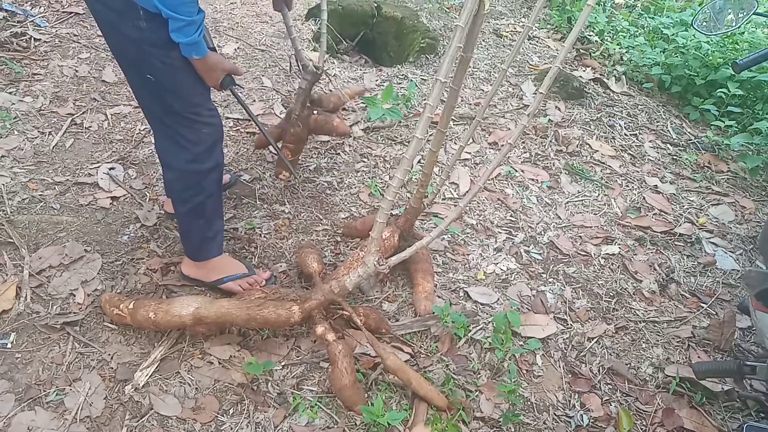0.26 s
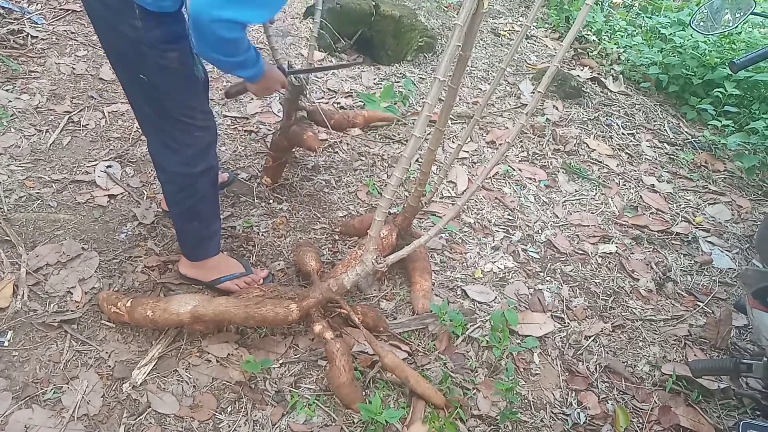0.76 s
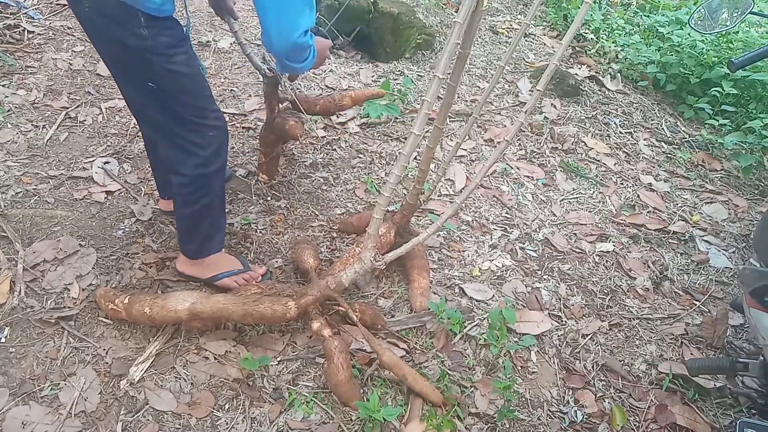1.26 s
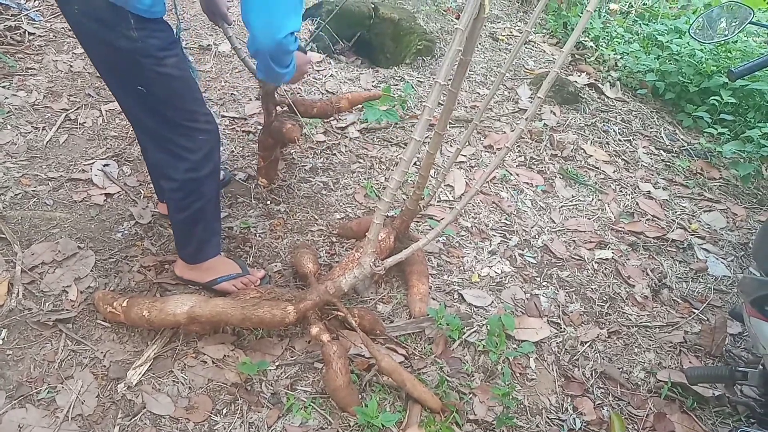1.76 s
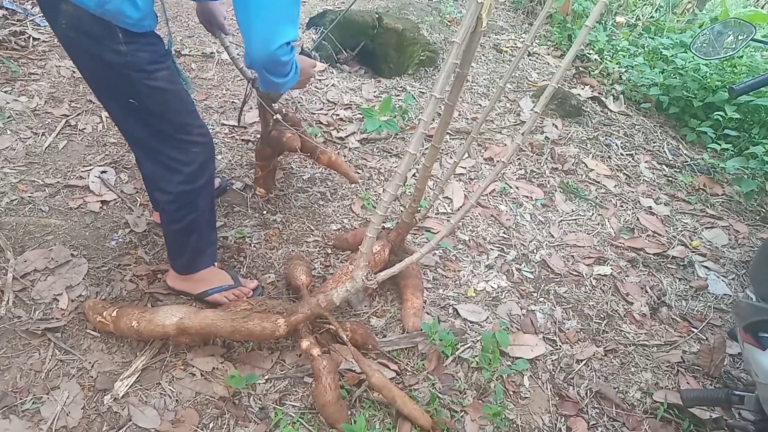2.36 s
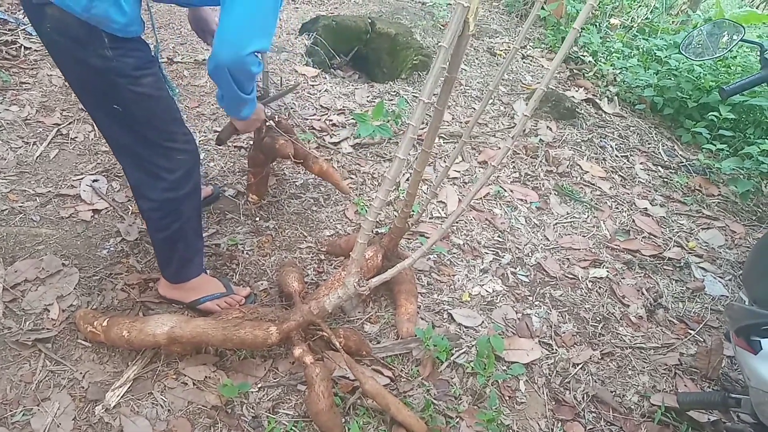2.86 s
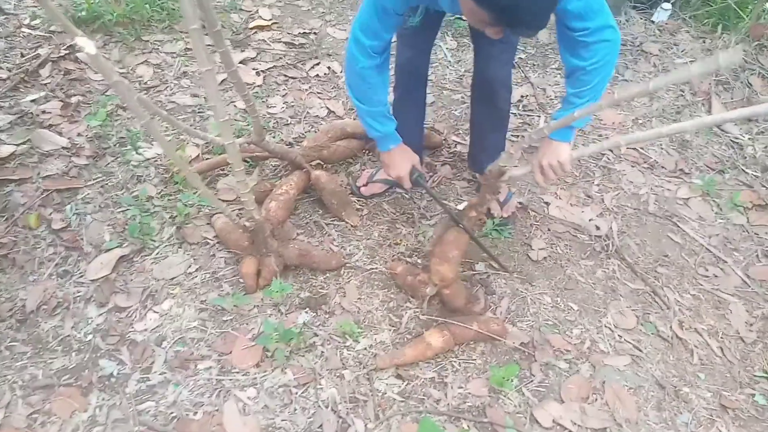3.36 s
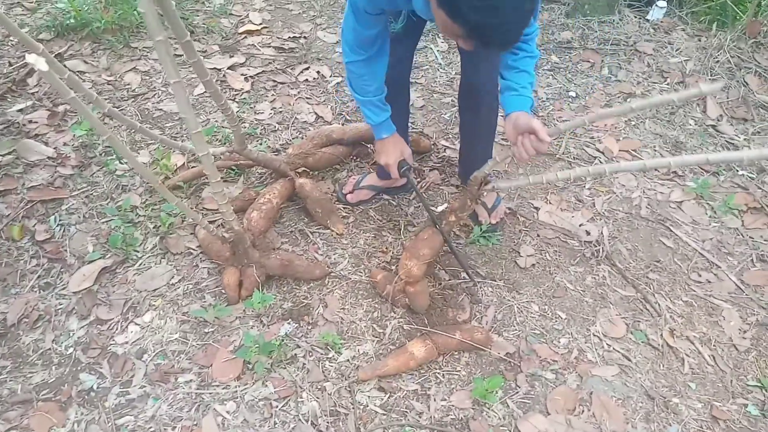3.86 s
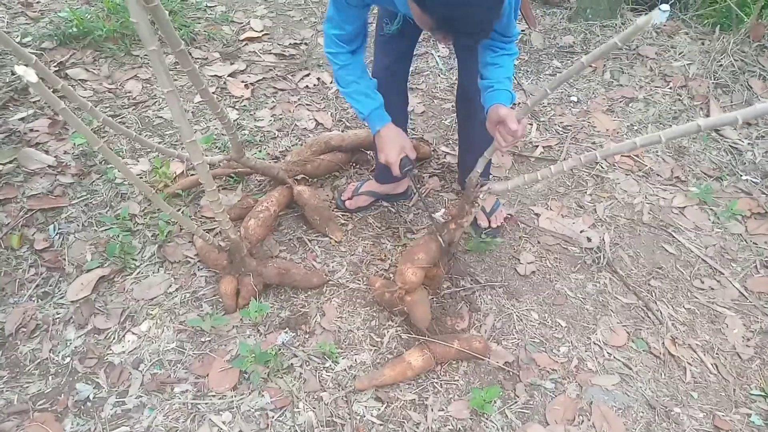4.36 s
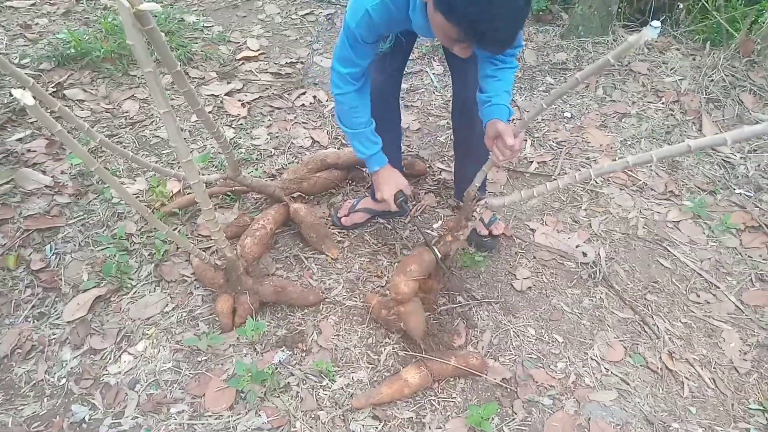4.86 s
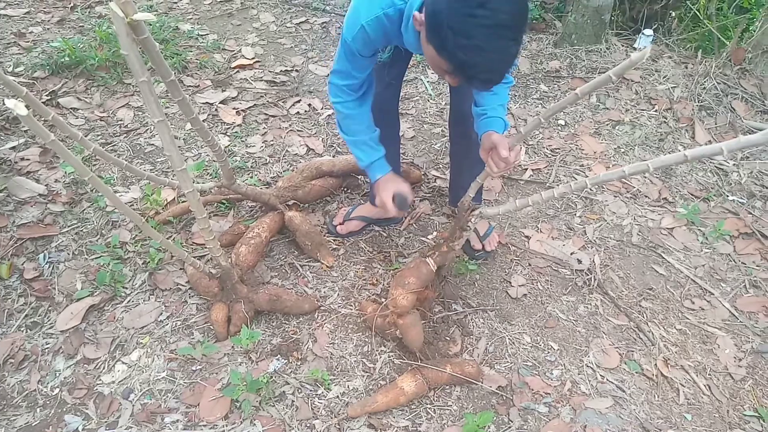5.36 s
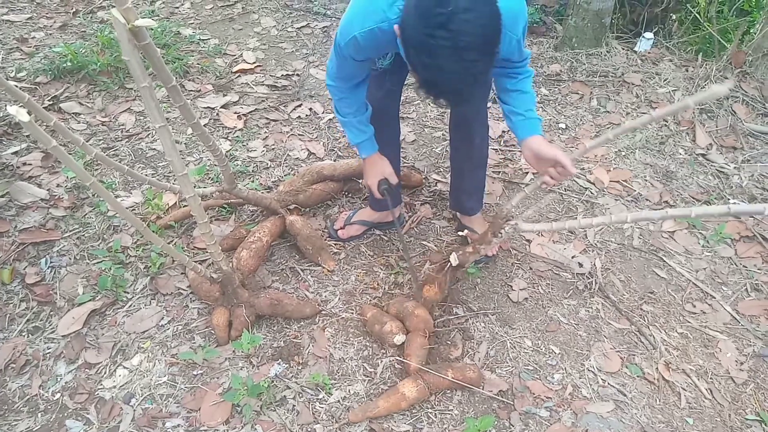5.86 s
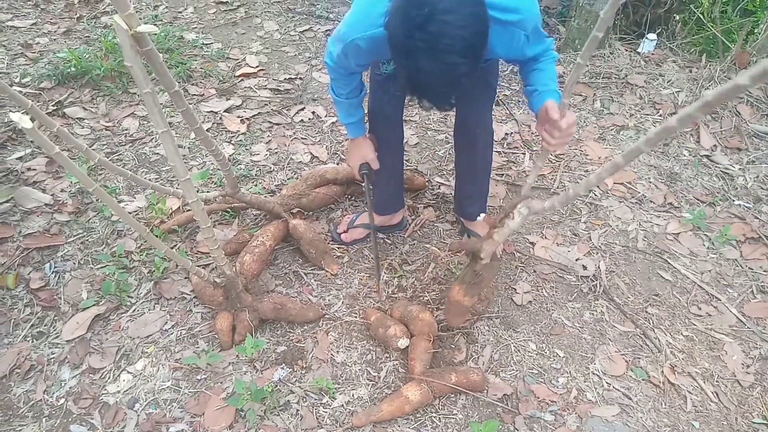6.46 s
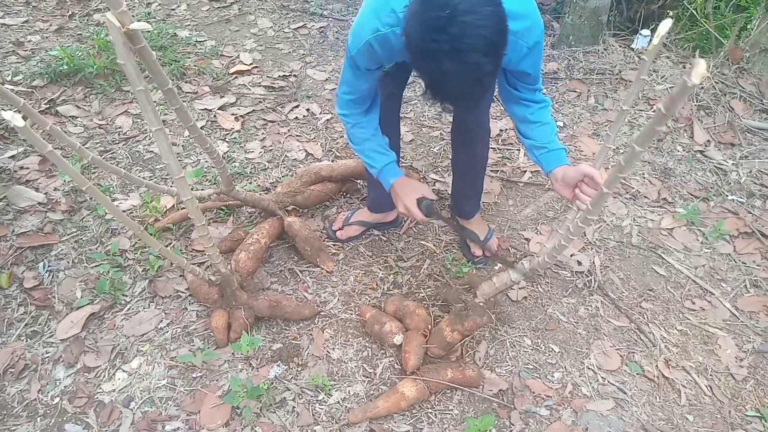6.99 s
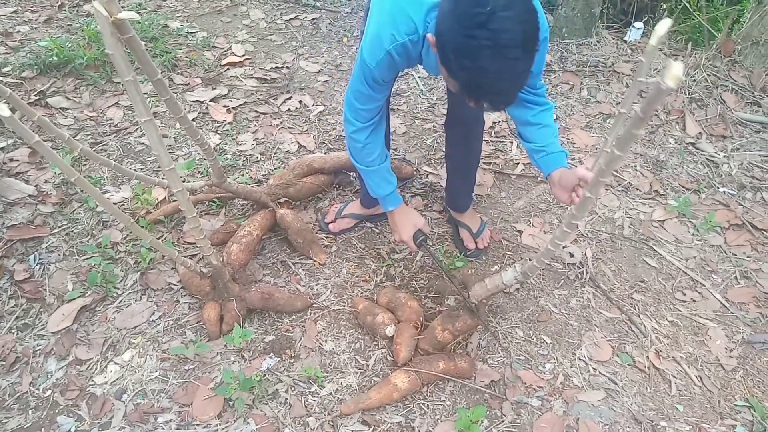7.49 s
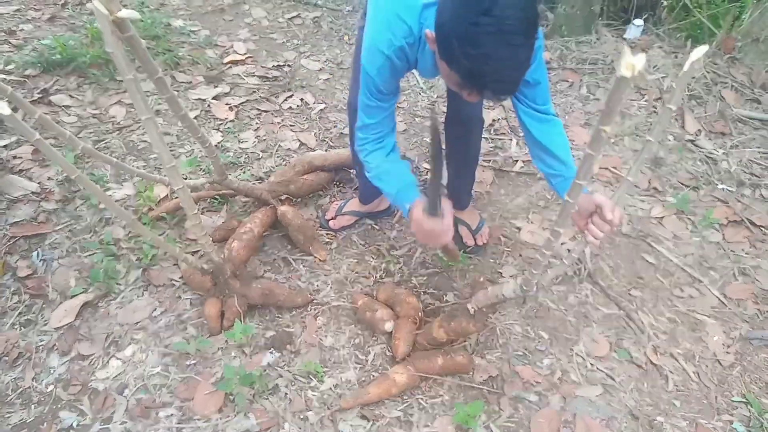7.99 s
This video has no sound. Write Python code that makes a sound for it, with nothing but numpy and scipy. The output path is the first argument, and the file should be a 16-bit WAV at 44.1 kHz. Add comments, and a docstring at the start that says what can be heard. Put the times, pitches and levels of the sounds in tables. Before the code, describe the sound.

A low, drifting far rumble and soft hiss lie under a dry garden scene, heard from close by. At first only soil grains rustle and a twig snaps faintly. From about 1.6 to 3 s small birds give faint, fuzzy rising whistles and a far fowl clucks. A blade chops a tuber at 1.9 s and more lightly at 2.75 s, leaves crunching between. At 3.07 s everything drops to silence for a tenth of a second, then fades back as a brighter chop lands at 3.3 s. Crumbs and twigs tick until a hard, close-set double strike at 4.8 s and the loudest crack at 5.45 s, followed by bumping tubers and brittle snaps. Leaves crunch around 6.2 and 6.6 s. Further woody blows fall at 7.35 and 8.15 s with snaps, trickling soil and short scattered echoes.

```python
"""A low far rumble (drifting noise), a soft hiss and a rustle of grains and snapping twigs open the scene.
Small birds whistle faintly (noise in gliding resonances) and a far fowl clucks (two partials).
Then a long blade chops root tubers on dry ground in a garden: runs of cracks ring wood and blade.
Soil and dead leaves crunch and trickle around the blows, tubers bump the ground, and echoes scatter.
Soon after 3 s the sound drops out once for a moment and fades back in; the chopping goes on."""
import sys
import numpy as np
from scipy import signal
from scipy.fft import rfft, irfft
from scipy.io import wavfile
from scipy.ndimage import uniform_filter1d

SR = 44100
rng = np.random.default_rng(int(sys.argv[2]) if len(sys.argv) > 2 else 0)


def store_wav(level_fs):
    """Save 16-bit WAV to argv[1]."""
    pcm = np.round(np.clip(np.atleast_2d(level_fs), -1, 1) * 32767)
    wavfile.write(sys.argv[1], SR, pcm.T.astype(np.int16))


N = 362943


def amp(db):
    """Level to amplitude: 20 dB is a factor of ten."""
    return 10 ** (np.asarray(db) / 20)


def evened(x):
    """Power normalisation: scales to rms 1."""
    return x / np.sqrt(np.mean(x ** 2) + 1e-20)


def topped(x):
    """Peak normalisation: scales to peak 1."""
    return x / (abs(x).max() + 1e-20)


def smoothed_twice(x, size, axis=-1):
    """Moving average: two passes leave only slow change."""
    return uniform_filter1d(uniform_filter1d(x, size, axis=axis), size, axis=axis)


def bandpass(x, order, lo_hz, hi_hz):
    """Band filtering: a Butterworth passband between two corners."""
    return signal.sosfilt(signal.butter(order, (lo_hz, hi_hz), "band", fs=SR, output="sos"), x)


def read(points, hz):
    """Spectral envelope: interpolates levels on a log frequency axis."""
    f, value = np.transpose(points)
    return np.interp(np.log(hz + 1), np.log(f + 1), value)


def add(mix, s, sound):
    """Superposition: adds a sound in at time s."""
    part = mix[max(round(s * SR), 0):][:len(sound)]
    part += sound[:len(part)]


def coloured(x, points, tilt_db=0):
    """Linear filtering: weights by a spectrum, tilted about 3 kHz in dB per octave."""
    hz = np.fft.rfftfreq(len(x), 1 / SR)
    tilt = tilt_db * np.log2(hz / 3000 + 0.057)  # the offset keeps the bass finite
    return irfft(rfft(x) * amp(read(points, hz) + tilt), len(x))


def ring(modes, focus_hz=0, narrow_db=0):
    """Modal response: sines die away; modes near the focus and its octaves are favoured."""
    t = np.arange(2500) / SR
    total = 0
    for hz, db, t60 in modes:
        octaves_off = abs((np.log2(hz / (focus_hz or hz)) + .5) % 1 - .5)  # to the nearest octave
        total = total + amp(db - narrow_db * octaves_off - 60 * t / t60) * np.sin(2 * np.pi * hz * t)
    return np.minimum(t / 0.00037, 1) ** 2 * total


def crumbs(n, per_s, spread_db, hiss):
    """Random impulse process: sparse clicks of uneven size over a little white noise."""
    struck = rng.random(n) < per_s / SR
    sign = rng.choice([-1., 1.], n)
    size = amp(spread_db * np.minimum(rng.exponential(1, n), 4))
    return evened(struck * sign * size) + hiss * rng.standard_normal(n)


def brittle(x):
    """Brittle fracture: the dry treble of a crack, from a band and a second difference."""
    return topped(bandpass(x, 3, 5500., 9500.) + 0.035 * np.diff(x, 2, prepend=[0, 0]))


def patchy(points, lo_hz, hi_hz, patch_db, bins, frames_long):
    """Random short-time spectra: drifting patches fade out in the treble; rms 1 within a band."""
    frames, hz = N // 256 + 5, np.fft.rfftfreq(1024, 1 / SR)
    a, b, patches = rng.standard_normal((frames, 513, 3)).T
    patches = uniform_filter1d(patches, round(bins), axis=0)
    patches = evened(uniform_filter1d(patches, round(frames_long), axis=1))
    depth_db = patch_db / (1 + (hz[:, None] / 3500) ** 2)
    spectra = (a + 1j * b) * amp(read(points, hz)[:, None] + depth_db * patches)
    inside = ((hz > lo_hz) & (hz < hi_hz))[:, None]
    whole, band = (signal.istft(v, nperseg=1024, noverlap=768)[1][:N] for v in (spectra, spectra * inside))
    return whole / band.std()


# spectrum of the far rumble: pitch_hz [Hz], level_db [dB per Hz, relative]
RUMBLE = [(15, -43.5), (25, -26), (59, -11), (145, 2), (299, -14), (344, -12), (424, -24), (508, -24.5),
          (700, -20.5), (910, -47.5), (1540, -120)]
# spectrum of the soft hiss: pitch_hz [Hz], level_db [dB per Hz, relative]
HISS = [(300, -24), (600, -5.5), (1000, -5.5), (1300, -2), (2300, -3), (3350, 2.5), (4430, 0.5),
        (5200, -11), (5700, -33), (6500, -21.5), (7200, -18.5), (7900, -37), (8600, -21), (9800, -30),
        (15500, -29.5)]
# slow swell of the air: time_s [s], rumble_db [dB, 60-400 Hz], hiss_db [dB, 600-2000 Hz]
AIR = [(0, -57, -70.5), (.38, -56.5, -66), (.7, -59.5, -68.5), (1.4, -57.5, -68), (1.9, -54, -69),
       (2.15, -56.5, -62.5), (2.55, -59.5, -73.5), (2.9, -54.5, -65), (3.4, -58, -65), (3.7, -55.5, -69.5),
       (4.04, -55.5, -65), (4.6, -57.5, -69.5), (5.3, -54.5, -67), (5.7, -56, -67), (6.5, -56.5, -65.5),
       (7.05, -56.5, -71), (7.7, -54, -62.5), (8.23, -57, -71.5)]


def air():
    """Broadband noise: a lumpy far rumble and a patchy hiss swell apart."""
    s, rumble_db, hiss_db = np.transpose(AIR)
    t = np.arange(N) / SR
    rumble = patchy(RUMBLE, 60, 400, 3.77, 2.8, 10.) * amp(np.interp(t, s, rumble_db))
    hiss = patchy(HISS, 600, 2000, 6.5, 5, 15) * amp(np.interp(t, s, hiss_db))
    return rumble + hiss


# soil thrown up or shaken loose: thickest_s [s], treble_level_db [dB], thinning_db_per_s [dB per s]
SHOWERS = [(.36, -79.5, 16.5), (2.14, -73, 50), (2.93, -80, 48), (3.47, -72, 20.5), (4.99, -73, 72),
           (5.52, -71.5, 37), (5.65, -68.5, 29.5), (6.74, -73, 50), (7.47, -71.5, 13.5), (8.23, -71, 50)]
SWELL_DB_PER_S, STILL_DB = 111, -90.5  # growth of each shower, level between showers


def showers_db(t):
    """Energy summation: each shower swells fast and thins at its own pace."""
    s, db, thin = np.transpose(SHOWERS)[..., None]
    each = db - np.where(t < s, SWELL_DB_PER_S * (s - t), thin * (t - s))
    return 10 * np.log10((amp(each) ** 2).sum(0) + amp(STILL_DB) ** 2)


# spectrum of soil grains and leaf litter: pitch_hz [Hz], level_db [dB per Hz, relative]
GRIT = [(290, -5), (500, -8.5), (748, -20), (901, -7), (1820, -5), (2040, -2.5), (2930, -2), (3630, 1.5),
        (4380, -4.5), (5590, -18), (8480, -18.5), (9930, -33), (15500, -39.5)]


def rustle():
    """Granular noise: fine crackle of leaves and falling soil in uneven flurries."""
    flurry_db = 3.4 * evened(smoothed_twice(rng.standard_normal(N), 700))
    grains = coloured(crumbs(N, 800., 3.5, 1.), GRIT) * amp(flurry_db)
    treble = bandpass(grains, 4, 5500, 10000)
    return grains / treble.std() * amp(showers_db(np.arange(N) / SR))  # level counts for the treble band


# sharp snaps of twigs and leaves, and the second strike of the blow near 4.83 s:
# start_s [s], level_db [dB], pitch_hz [Hz], tick_db [dB, relative]
SNAPS = [(0.0737, -40, 4270, -34), (2.1943, -36.5, 1790, -31), (2.261, -42, 3360, -30),
         (2.9072, -38.5, 1870, -35), (2.9507, -39.5, 1670, -20), (3.4862, -38, 3390, -18),
         (3.5144, -39.5, 3400, -25), (3.556, -46, 3400, -4), (3.69, -41.5, 3730, -18),
         (3.8432, -43, 3740, -11), (3.921, -46, 3350, -10), (4.5288, -46, 3230, -11),
         (4.8282, -20, 3050, -10), (4.8339, -12.5, 3590, -24), (4.853, -28, 3000, -25),
         (5.1195, -40.5, 3580, -12.5), (5.5668, -36, 2830, -30), (5.7114, -42, 3500, -34),
         (5.807, -36.5, 2840, -28), (5.817, -32, 3600, -33), (5.8375, -27, 3140, -28),
         (5.8912, -30, 3480, -33), (6.0445, -44, 3300, -33), (6.6664, -39, 3270, -19),
         (6.6987, -39.5, 3770, -30), (6.7563, -42, 3580, -13), (6.8665, -38, 3900, -30),
         (7.518, -43, 3660, -20), (7.5577, -36, 3770, -25), (7.5813, -30, 3430, -27),
         (7.5939, -22, 4000, -36), (7.637, -32, 4000, -29), (7.7594, -49, 3510, -20),
         (7.7905, -41, 3800, -27), (7.822, -45, 3370, -11), (7.862, -27.5, 3820, -20),
         (7.8687, -33, 3550, -27), (7.8972, -34.5, 3760, -32), (8.189, -33, 3900, -10),
         (8.216, -35, 3870, -28), (8.2214, -30, 3800, -31), (8.2254, -27.5, 3590, -20)]
SNAP_T60_S = .009


def snap(level_db, hz, tick_db):
    """Impulse excitation: a noise burst rings five short modes, with a treble tick."""
    t60 = SNAP_T60_S
    burst = rng.standard_normal(600) * np.exp(-np.arange(600) / SR / 0.00074)
    modes = [(hz, 0.1, t60), (hz * 0.54, -5, t60 * .5), (hz * 0.783, -3, t60 * 0.84),
             (hz * 1.033, -3, t60 * 0.7), (hz * 1.3, -9, t60 * .5)]
    body = signal.convolve(burst, ring(modes))[:600]
    return amp(level_db) * (topped(body) + amp(tick_db) * brittle(burst))


SMALL_SNAPS_PER_S, SMALL_SNAP_HZ = 49, (2560, 4320)
SMALL_SNAP_DB, SMALL_TICK_DB = 26.5, -14  # strongest snap above the shower's treble, tick against snap


def small_snaps():
    """Random arrivals: faint snaps at chance moments, following the level of the showers."""
    draws = rng.random((round(SMALL_SNAPS_PER_S * N / SR), 3))
    s, (lo, hi) = draws[:, 0] * N / SR, SMALL_SNAP_HZ
    level_db = showers_db(s) + SMALL_SNAP_DB - 6.3 * draws[:, 1]
    pitch_hz = lo + (hi - lo) * draws[:, 2]
    return np.transpose([s, level_db, pitch_hz, SMALL_TICK_DB + 0 * s])


def resonate(x, hz, width):
    """Heterodyne filtering: shifts the curve hz to zero, smooths, shifts back."""
    turn, r = np.exp(2j * np.pi * np.cumsum(hz) / SR), np.exp(-np.pi * width / SR)
    return 2 * (turn * signal.lfilter([1 - r], [1, -r], x / turn)).real


# fuzzy rising whistles of small birds: start_s [s], length_s [s], from_hz [Hz], to_hz [Hz],
# level_db [dB], blur_hz [Hz, width of each of two resonances]
WHISTLES = [(1.648, 0.46, 2410, 3100, -65, 120), (1.977, 0.26, 1850, 2340, -59.5, 151),
            (2.39, 0.35, 2620, 3250, -56, 594), (2.687, 0.11, 2030, 2190, -67.5, 60)]
GLIDE_BEND, WHISTLE_ENDS_DB = .55, -11.5  # the glide slows towards its top


def whistle(length, from_hz, to_hz, level_db, blur):
    """Resonant filtering: noise in a narrow gliding resonance, its envelope loudest midway."""
    u = np.arange(round(length * SR)) / (length * SR)
    glide = from_hz + (to_hz - from_hz) * u ** GLIDE_BEND
    tone = resonate(resonate(rng.standard_normal(len(u)), glide, blur), glide, blur)
    return evened(tone) * amp(level_db + WHISTLE_ENDS_DB * (2 * u - 1) ** 2)


# clucks of a far fowl: start_s [s], length_s [s], pitch_hz [Hz], level_db [dB, before partial gains]
CLUCKS = [(1.709, .12, 622, -62.5), (2.301, 0.13, 705, -69.5), (2.994, 0.11, 615, -62)]
CLUCK_RISE_S, CLUCK_FADE_DB = 0.022, -12


def cluck(length, hz, level_db):
    """Harmonic voice: two slightly shaky partials, the second stronger."""
    t = np.arange(0, length, 1 / SR)
    shake = 0.5 * uniform_filter1d(rng.standard_normal(len(t)), size=150)
    turns = np.cumsum(hz * (1 + shake)) / SR
    shape = np.minimum(t / CLUCK_RISE_S, 1) ** 2 * amp(level_db + CLUCK_FADE_DB * (t / length) ** 2)
    return shape * (1.34 * np.sin(2 * np.pi * turns) + 1.8 * np.sin(4 * np.pi * turns))


# modes of root and stem: pitch_hz [Hz], level_db [dB, relative], t60_s [s]
WOOD = [(543, -33.5, 0.008), (836, -2, 0.018), (1037, -1, 0.029), (1138, -10, 0.032), (1572, -0.5, 0.016),
        (2078, -2.5, 0.016)]
# clods and stems crunch into the leaves: start_s [s], level_db [dB], rise_s [s], t60_s [s],
# tilt_db [dB per octave], stem_db [dB, ring of the stem against the grit]
CRUNCHES = [(1.8707, -39, 0.00083, 0.066, -4, -24), (3.482, -45.5, 0.0044, 0.12, 2, -10),
            (5.4491, -18.5, 0.0036, 0.044, 1.5, -20), (5.556, -40, 0.0035, 0.21, -1, -17),
            (6.218, -38, 0.0033, 0.24, 2.5, -4), (6.638, -40, 0.009, 0.17, 1, -13),
            (7.598, -43, 0.0043, 0.13, 2.5, -23)]


def crunch(level_db, rise, t60, tilt_db, stem_db):
    """Granular collapse: many grains give way at once and settle, knocking on the wood."""
    t = np.arange(round(.4 * SR)) / SR
    grains = crumbs(len(t), 2500, 2.8, .9)
    stem = signal.oaconvolve(grains, ring(WOOD, 1205., 20.))[:len(t)]
    grit = evened(coloured(grains, GRIT, tilt_db)) + amp(stem_db) * evened(stem)
    return amp(level_db - 60 * t / t60) * grit * np.minimum(t / rise, 1)


# modes of the blade and the splitting fibres: pitch_hz [Hz], level_db [dB, relative], t60_s [s]
BLADE = [(2416, 6.5, 0.0095), (3026, -2.1, 0.0098), (3300, 0, 0.013), (4023, 2, 0.014),
         (4276, -10.5, 0.018), (4870, -7.5, 0.016)]
# blade blows: start_s [s], level_db [dB], thud_hz [Hz], wood_focus_hz [Hz], blade_focus_hz [Hz],
# then relative to the blow: thud_db [dB], wood_db [dB], split_db [dB], treble_db [dB];
# split_s [s, time scale of the splitting], debris_db [dB, relative to the blow]
CHOPS = [(1.879, -15.5, 303, 910, 4270, -5.5, -3.5, -6.5, -42.5, 0.0058, -17),
         (2.7541, -19, 422, 936, 3840, -10.5, -11, -5, -39, 0.0023, -18.5),
         (3.3259, -12, 292, 760, 3280, -12, -6.5, -3.5, -14, 0.011, -17),
         (4.811, -3, 317, 830, 3200, -19.5, -13.5, -16.5, -32, 0.01, -21.5),
         (5.4528, -1.5, 148.4, 826, 3040, -28.5, -5, -4.5, -17, 0.0025, -24.5),
         (7.358, -9, 173, 1110, 3160, -10, -2, -2, -20.5, 0.0093, -18),
         (8.1406, -4, 205, 1030, 3370, -18, -9, -2.5, -16, 0.0072, -19.5)]
DEBRIS_T60_S = 0.17  # grit scattered by each blow


def chop(level_db, thud_hz, wood_hz, blade_hz, thud_db, wood_db, split_db, treble_db, split_s, debris_db):
    """Fracture and modal ringing: cracking fibres ring wood and blade; the root thuds, debris scatters."""
    t = np.arange(round(.35 * SR)) / SR
    u = t / split_s
    cracks = crumbs(len(t), 4000., 2.3, 0.36) * u ** 0.13 * np.exp(-3.5 * u ** 1.88)
    cracks[10] += 1.35 * abs(cracks).max() * np.sign(cracks[10])  # the first touch of the edge
    wood = topped(signal.oaconvolve(cracks, ring(WOOD, wood_hz, 28.0))[:len(t)])
    blade = topped(signal.oaconvolve(cracks, ring(BLADE, blade_hz, 21.0))[:len(t)])
    thud_decay = amp(-60 * t * thud_hz / 10.0)  # falls 60 dB in ten cycles
    thud = np.sin(2 * np.pi * thud_hz * t) * thud_decay * np.minimum(t / 0.0011, 1)
    grit = evened(coloured(crumbs(len(t), 2500., 2.3, 0.74), GRIT, -1.9))
    debris = grit * amp(-60 * t / DEBRIS_T60_S) * np.minimum(t / 0.00035, 1)
    parts = ((thud_db, thud), (wood_db, wood), (split_db, blade), (treble_db, brittle(cracks)),
             (debris_db, debris))
    return amp(level_db) * sum(amp(db) * part for db, part in parts)


# tubers bump the ground: start_s [s], level_db [dB], pitch_hz [Hz], t60_s [s]
BUMPS = [(2.127, -49, 191, 0.094), (2.766, -40.5, 123, 0.19), (4.819, -34, 125, 0.15),
         (4.422, -38, 158, 0.11), (5.534, -25, 195, 0.052), (5.589, -35, 126, 0.066),
         (7.142, -37.5, 136, 0.074)]


def bump(level_db, hz, t60):
    """Damped oscillation: a dull low ring with a soft start."""
    t = np.arange(round(.2 * SR)) / SR
    return amp(level_db - 60 * t / t60) * np.sin(2 * np.pi * hz * t) * np.minimum(t / 0.0041, 1)


# scattered echoes from wall and trunks: first_arrival_s [s], t60_s [s], level_db [dB]
GARDEN = (0.022, 0.37, -16.5)


def garden(x):
    """Scattering: sparse taps of random sign after a strong first echo; the bass passes the trunks."""
    first, t60, db = GARDEN
    t = np.arange(round(.2 * SR)) / SR
    taps = crumbs(len(t), 700., 2.5, 0.011) * amp(-60 * t / t60) * (t > first)
    taps[round(first * SR)] += 32.
    taps = bandpass(taps / np.linalg.norm(taps), 2, 600., 6000.)
    return amp(db) * signal.oaconvolve(x, taps)[:N]


def scene():
    """Superposition: near sounds with their echoes over the far ones."""
    near, far = np.zeros(N), air() + rustle()
    layers = ((near, SNAPS, snap), (near, small_snaps(), snap), (far, WHISTLES, whistle),
              (far, CLUCKS, cluck), (near, CRUNCHES, crunch), (near, CHOPS, chop), (near, BUMPS, bump))
    for mix, table, source in layers:
        for s, *row in table:
            add(mix, s, source(*row))
    return (near + garden(near) + far)[None]


# one brief silence: stop_s [s], restart_s [s], full_again_s [s]
DROPOUT = (3.071, 3.168, 3.33)
EDGE_HZ = 15500  # upper band limit


def record(dry):
    """Band limiting and gating: bass roll-off, a short silence with a fade back in, a treble edge."""
    stop, restart, full = DROPOUT
    t = np.arange(N) / SR
    before = np.clip((stop - t) / 0.0055, 0, 1)
    after = np.clip((t - restart) / (full - restart), 0, 1) ** 0.96
    thin = signal.sosfilt(signal.butter(3, 55., "high", fs=SR, output="sos"), dry)
    edge = signal.firwin(511, EDGE_HZ, window=("kaiser", 9), fs=SR)
    return signal.oaconvolve(thin * (before + after), edge[None], "same")


dry = scene()
out = record(dry)
store_wav(out)
```